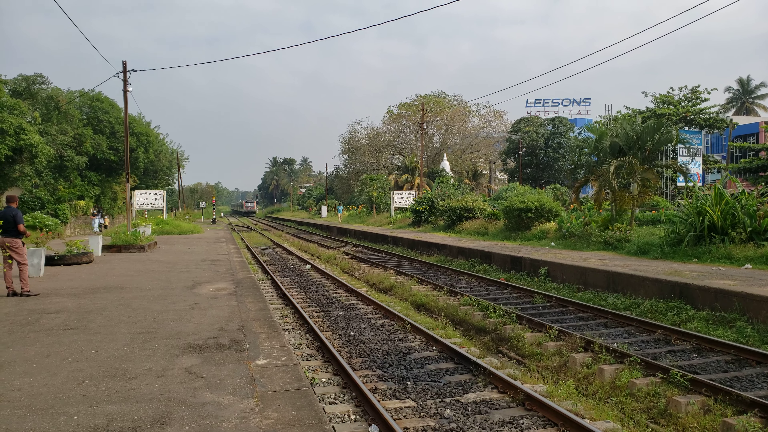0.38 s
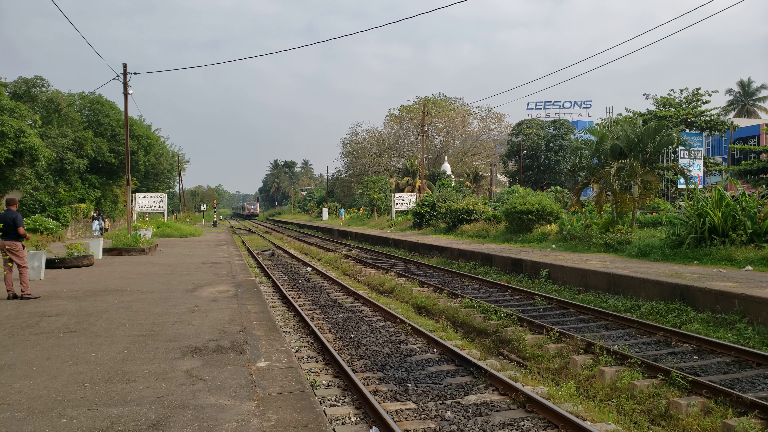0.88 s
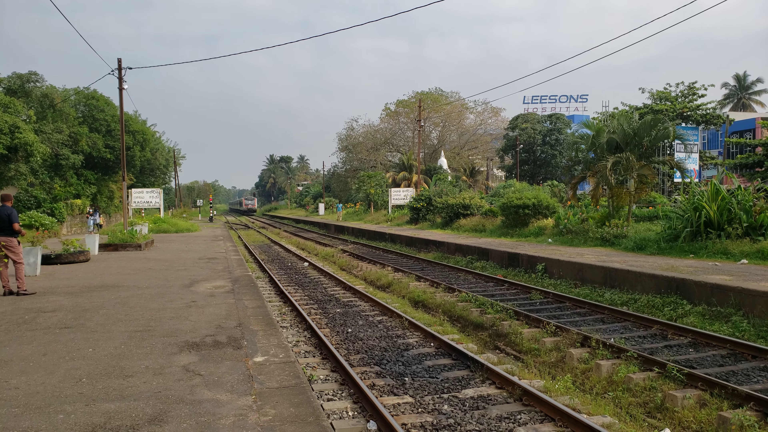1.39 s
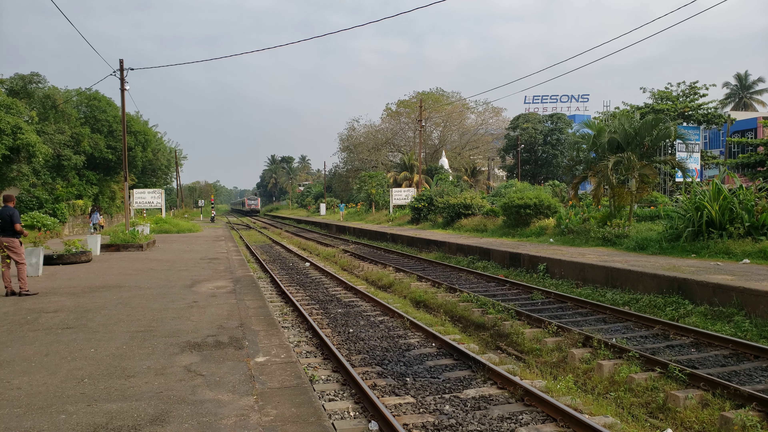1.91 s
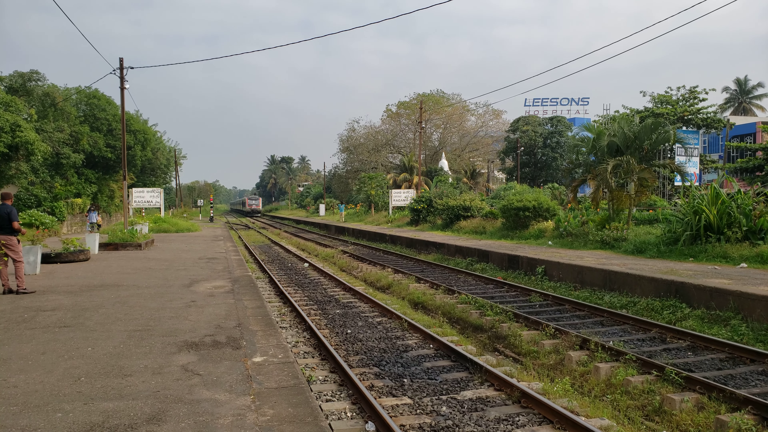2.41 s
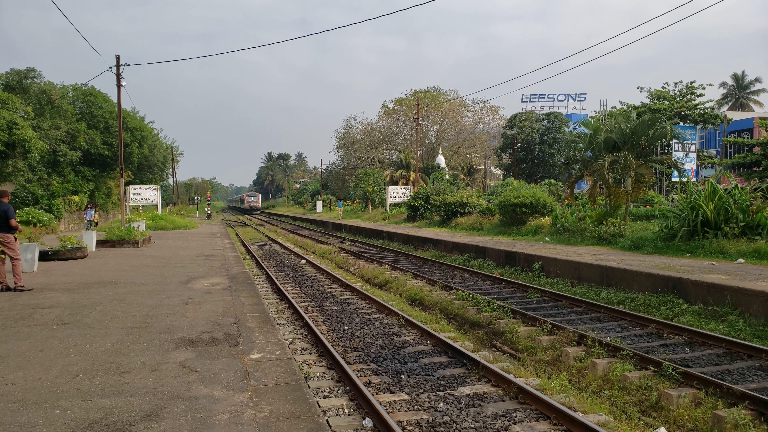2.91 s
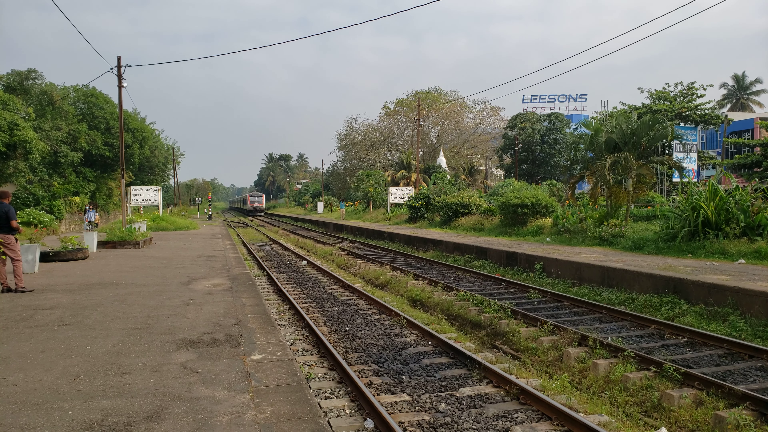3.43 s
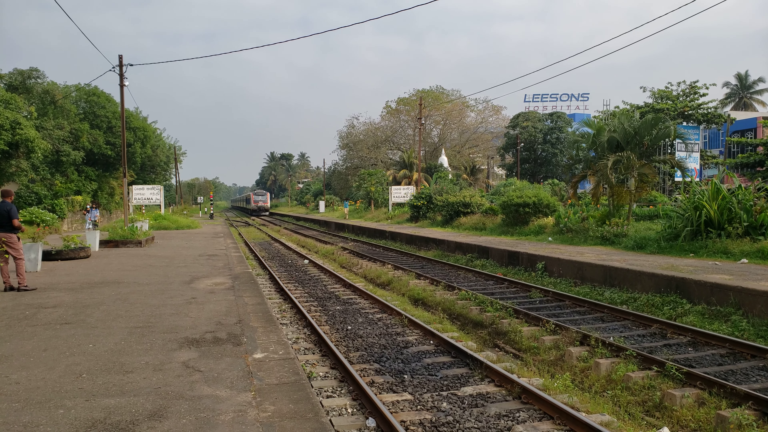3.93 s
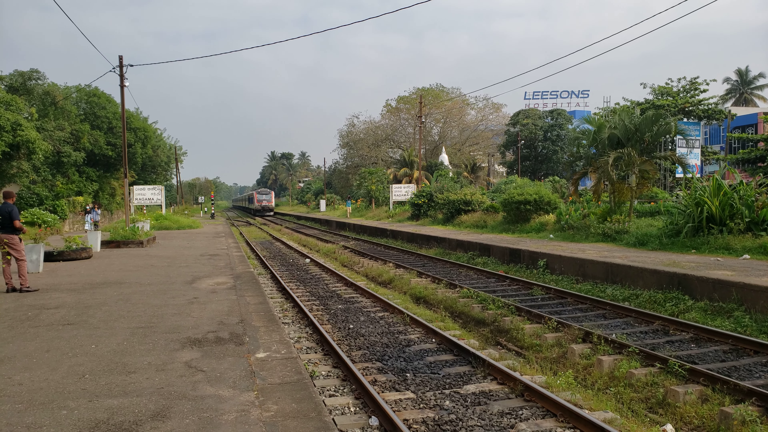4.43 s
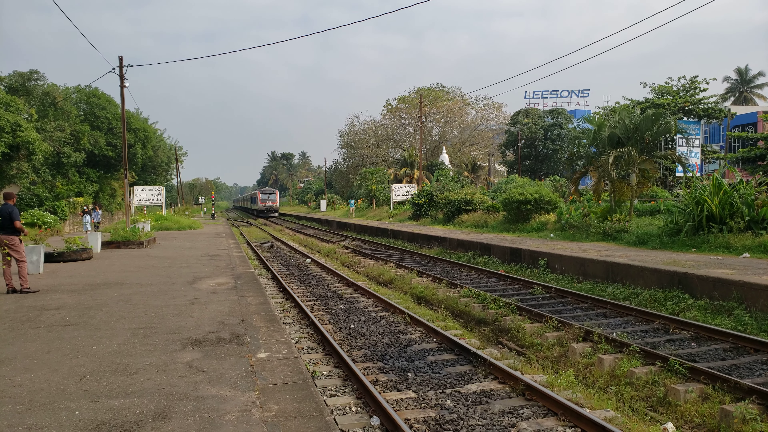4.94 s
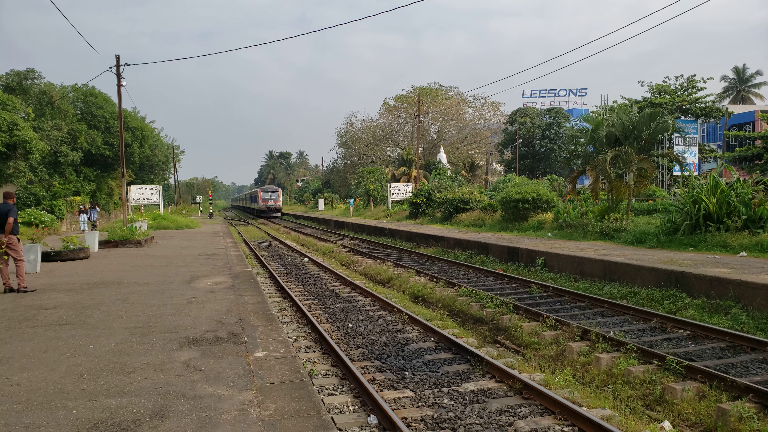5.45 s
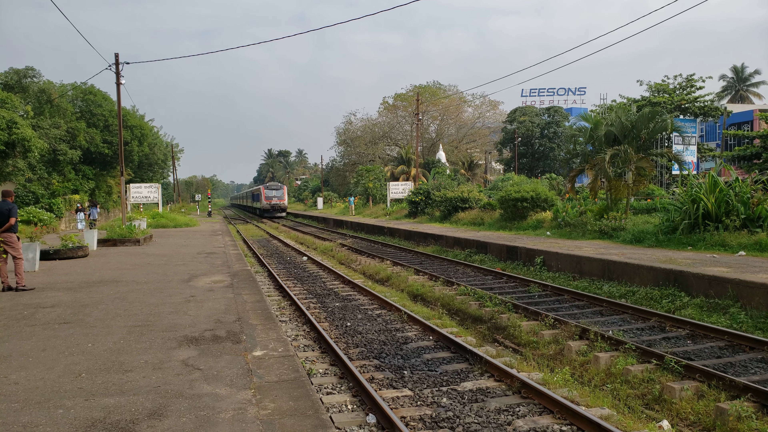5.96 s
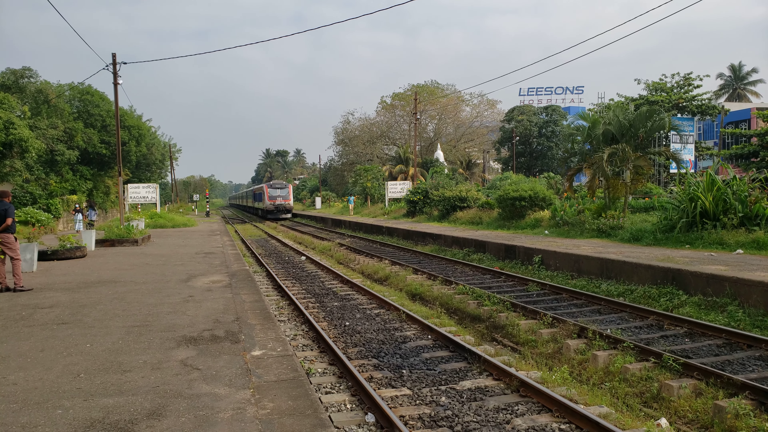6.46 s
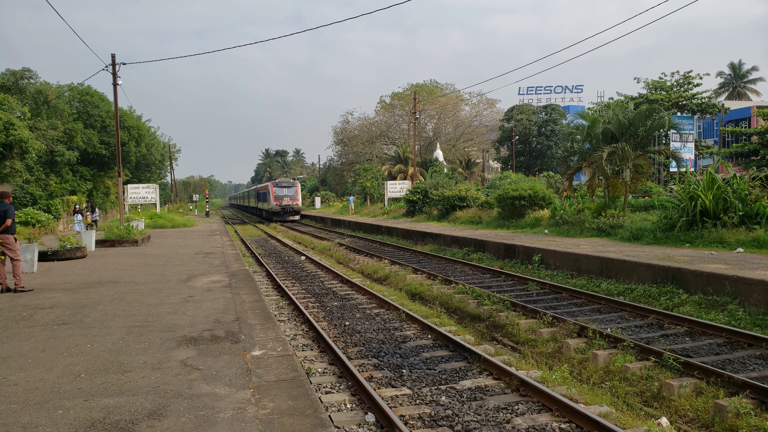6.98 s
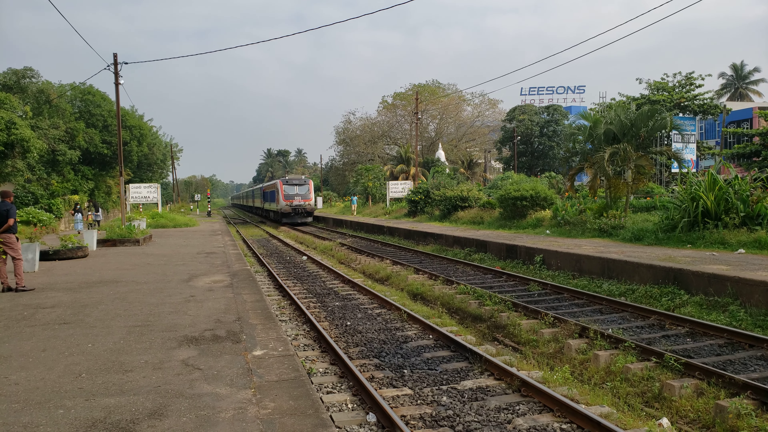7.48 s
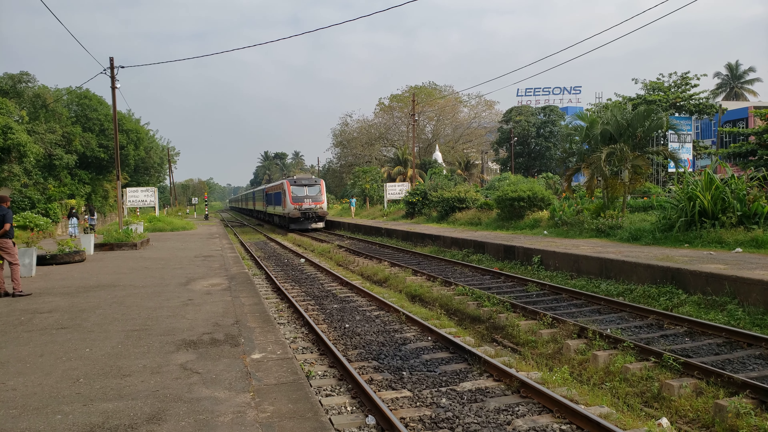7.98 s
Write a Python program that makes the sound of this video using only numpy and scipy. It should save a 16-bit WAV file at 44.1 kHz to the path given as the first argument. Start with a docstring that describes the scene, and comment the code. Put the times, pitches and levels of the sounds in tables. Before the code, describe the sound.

On an open country platform, a big diesel idles close by throughout, its deep uneven throb about four cycles a second, with dull block knocks, light valve clatter and broad fan roar. Soft airy chuffs puff irregularly. A distant train's low drone, rumble and rolling noise swell steadily, still approaching at the end, when a bright hiss bursts in. Stereo outdoor microphone, duller treble on the right.

```python
"""A country platform: a big twelve-cylinder diesel idles close by, another train nears and a bird chirps.
Firing and blower pulses excite resonances of the exhaust stack, block and valve gear; noise makes the fan roar,
soft chuffs, a late burst of hiss and faint patches of very high hiss. The train is a drone, a rumble and rolling
noise that grow as its distance shrinks; the bird is two gliding sines. The right microphone port is muffled from
about 2.5 to 9.5 kHz."""
import sys
import numpy as np
from scipy import signal
from scipy.fft import rfft, irfft, next_fast_len
from scipy.io import wavfile
from scipy.ndimage import uniform_filter1d

SR = 44100
rng = np.random.default_rng(int(sys.argv[2]) if len(sys.argv) > 2 else 0)


def unload_audio(sound):
    """Save the sound as a 16-bit wav file, at the path given as the first command line argument."""
    columns = np.transpose(np.atleast_2d(sound))
    # keep every value between -1 and 1, then stretch to whole-number steps
    steps = np.round(np.clip(columns, -1, 1) * 32767)
    wavfile.write(sys.argv[1], SR, steps.astype(np.int16))


def boost(x):
    """Linear amplitude factor 10**(x/20) for a level x in decibels (scalar or array-like)."""
    u = np.asarray(x, float) / 20
    return 10 ** u


N = 357651

# Firings of the cylinders, in groups of three.
# Each row: crank angle in degrees of a 720-degree cycle, strength of the exhaust pulse in dB.
CYLINDERS = [(46.2, 1.5), (99.1, -3.3), (150.6, -14.2), (232.2, -6.9), (283.7, -7.3), (357.8, -11.2),
             (409.8, -2.1), (463.2, -1.5), (512.0, -7.9), (591.6, -4.3), (641.5, -8.5), (714.4, -3.2)]


def rms_one(x):
    """Normalization: scales a signal to a root mean square of 1."""
    return x / np.sqrt(np.mean(x ** 2) + 1e-20)


def in_time(swells):
    """Level envelope: the sum of Gaussian swells in dB, one value per sample."""
    t = np.arange(N) / SR
    return sum(db * np.exp(-((t - centre) / half) ** 2) for centre, half, db in swells)


def drift(rate_hz):
    """Slow random modulation of rms 1: white noise through a two-pole low-pass filter."""
    step = 40   # samples between the computed values
    r = np.exp(-2 * np.pi * rate_hz * step / SR)
    noise = rng.standard_normal(N // step + 2002)
    slow = signal.lfilter([1], [1, -2 * r, r * r], noise)[2000:]   # past the filter's onset
    return np.interp(np.arange(N) / step, np.arange(len(slow)), rms_one(slow))


def ring(clicks, hz, t60):
    """Damped resonator: a unit click starts a sine of height 1 that decays by 60 dB in t60 seconds."""
    r, w = boost(-60 / (t60 * SR)), 2 * np.pi * hz / SR
    return signal.lfilter([0, np.sin(w)], [1, -2 * r * np.cos(w), r * r], clicks + 1e-18)


def band(low_hz, high_hz, channels=1):
    """Band-limited noise of rms 1: white noise through a Butterworth band-pass filter."""
    sos = signal.butter(2, [low_hz, high_hz], "band", fs=SR, output="sos")
    noise = rng.standard_normal((channels, N + SR))
    return rms_one(signal.sosfilt(sos, noise)[:, SR:])


def ports(x, pan_db, lag):
    """Level and time differences: left over right by pan_db, and the right port later by lag samples."""
    n = np.arange(N)
    left = boost(pan_db / 2) * np.interp(n + lag / 2, n, x)
    right = boost(-pan_db / 2) * np.interp(n - lag / 2, n, x)
    return np.array([left, right])


def bins():
    """Discrete spectrum: its transform size and the frequencies of its bins in Hz."""
    size = next_fast_len(N)
    return size, np.maximum(np.arange(size // 2 + 1) * SR / size, 1)


def at_hz(points, hz):
    """Spectral envelope: interpolates the points along a log-frequency axis."""
    point_hz, value = np.transpose(points)
    return np.interp(np.log(hz), np.log(point_hz), value)


def crank():
    """Rotation phase: cycles turned at each sample, from one second before the start."""
    # The governor hunts, so the crank runs ahead of or behind its mean pace.
    # Each row: time in seconds, lead in crank degrees.
    lead = [(0, 1.6), (.7, .8), (1.2, -1.5), (1.7, -2.7), (2.3, -2.8), (3, -2.1), (4.1, .9), (5.3, 1.1),
            (6.2, 2), (6.8, 1.7), (7.7, 0), (8.1, 0)]
    cycles_per_s = 3.9622
    t = np.arange(-SR, N) / SR
    return t * cycles_per_s + np.interp(t, *np.transpose(lead)) / 720


def beats(turned, degrees, levels_db, uneven_db):
    """Impulse train: a click as the crank passes each angle, its level spread at random by uneven_db."""
    due = np.arange(-3, 33)[:, None] + np.asarray(degrees) / 720   # in cycles
    strength = boost(levels_db + uneven_db * rng.standard_normal(due.shape))
    inside = (due > turned[0]) & (due < turned[-1])
    clicks = np.zeros(len(turned))
    clicks[np.searchsorted(turned, due[inside])] = strength[inside]
    return clicks


def exhaust(turned):
    """Modal excitation: firing and blower pulses ring the stack; only the swing about mean pressure is heard."""
    # Modes of the exhaust stack.
    # Each row: frequency in Hz, level in dB, t60 in seconds, sign.
    stack_modes = [(44.8, -23.3, 0.568, -1), (51.7, -13.8, 0.6, -1), (52.1, -8.5, 0.113, 1),
                   (76.5, -6.0, 0.284, -1), (88.9, -10.9, 0.6, 1), (97.4, -26.4, 0.6, 1),
                   (116.6, -38.1, 0.279, -1), (143.2, -33.6, 0.6, 1), (164.2, -45.5, 0.6, -1),
                   (180.9, -45.5, 0.6, 1), (211.8, -49.1, 0.6, -1)]
    blower_pulses = 15   # even pulses per cycle, from a geared blower
    blower_deg = -3.5 + np.arange(blower_pulses) * 720 / blower_pulses
    firings = beats(turned, *np.transpose(CYLINDERS), uneven_db=.15)
    pulses = firings + beats(turned, blower_deg, 0, uneven_db=.02)
    stack = sum(sign * boost(db) * ring(pulses, hz, t60) for hz, db, t60, sign in stack_modes)[SR:]
    return stack - stack.mean()


def block(turned, apart_per_khz):
    """Modal coupling: firings of equal strength knock the block, each with a lasting gain per mode and port."""
    # Modes of the engine block.
    # Each row: frequency in Hz, mean level in dB, t60 in seconds.
    block_modes = [(143.2, -38.5, 0.25), (165, -38, 0.091), (213.6, -42.5, 0.15), (277, -42.5, 0.15),
                   (306, -42, 0.083), (322.6, -40, 0.18), (372.6, -37, 0.12), (413, -40, 0.12),
                   (447, -38, 0.11), (495, -42.5, 0.051), (531.7, -41.5, 0.12), (566, -40.5, 0.14),
                   (598.6, -43, 0.14), (649.5, -43.5, 0.14), (700, -40, 0.089), (734.5, -43, 0.11),
                   (897, -46.5, 0.12), (1600, -51.5, 0.16)]
    reach = rng.standard_normal((len(block_modes), 3, len(CYLINDERS)))
    out, degrees = np.zeros((2, N)), np.array(CYLINDERS)[:, 0]
    knocks = [beats(turned, [angle], 0, uneven_db=0.0) for angle in degrees]
    for (hz, db, t60), (both, left, right) in zip(block_modes, reach):
        level_db = db + 2.0 * drift(1.0)   # each mode comes and goes as the air between shifts
        own = np.clip(apart_per_khz * hz / 1000, 0, 1)   # the ports differ more as the wavelength shrinks
        for port, side in enumerate((left, right)):
            coupling = rms_one(np.sqrt(1 - own) * both + np.sqrt(own) * side)
            late = 8 * port   # samples
            out[port] += boost(level_db) * ring(coupling @ knocks, hz, t60)[SR - late:][:N]
    return out


def clatter(turned):
    """Impact excitation: each knock is a short rattle of noise that rings its part."""
    # Valve gear and covers.
    # Each row: ring frequency in Hz, t60 in seconds, relative level in dB, left over right in dB,
    # knocks per cycle, angle of the first knock in crank degrees.
    parts = [(685, 0.029, -42, -2.5, 3, 120), (1570, 0.16, -44, -8, 3, 112.7),
             (1853, 0.2, -46, -1.5, 1, 700), (2270, 0.022, -46.5, 1, 1, 22),
             (10500, .006, -73.5, 1, 1, 492)]
    out, rattle = 0, np.hanning(round(0.0053 * SR))
    for hz, t60, db, pan_db, count, first in parts:
        degrees = first + np.arange(round(count)) * 720 / round(count)
        knocks = beats(turned, degrees, db, uneven_db=0.5)
        length = min(len(rattle), round(t60 * SR / 3))   # samples
        envelope = np.convolve(knocks, signal.resample(rattle, length), "same")
        burst = envelope * rng.standard_normal(len(turned))
        out = out + ports(ring(burst, hz, t60)[SR:] / np.sqrt(length / 3), pan_db, lag=20)
    return out


def roar(turned, patchy_db, breath_db):
    """Partially coherent broadband noise: octave bands flicker, and the top breathes twice a cycle with the leaks."""
    # Fan and street roar, before the flicker. Each row: frequency in Hz, density in dB per Hz.
    density = [(22, -72), (32, -63), (45, -53.5), (62, -48), (80, -49.5), (105, -49.5), (135, -56.5),
               (200, -56.5), (300, -60), (460, -60.5), (600, -62.5), (750, -64.5), (810, -66), (1300, -68),
               (1700, -74.5), (2150, -75.5), (2700, -75.5), (3400, -78.5), (4300, -87), (5500, -90),
               (6400, -93.5), (7300, -93), (8000, -101.8), (8800, -105.3), (11300, -109.5), (12800, -115.8),
               (15000, -118.2)]
    # Likeness of the ports. Each row: frequency in Hz, squared left-right coherence.
    likeness = [(60, 1), (100, 0.97), (180, 0.94), (320, 1), (450, 0.61), (560, 0.85), (700, 0.12),
                (1000, 0.042), (1350, 0.18), (1650, 0.78), (2000, 0.38), (2500, 0.052)]
    # Delay of the right port. Each row: frequency in Hz, delay in samples.
    delay = [(1000, 9.1), (1400, 20.5)]
    # Swells of the treble hiss. Each row: centre in seconds, half length in seconds, height in dB.
    hiss_swells = [(0.1, 0.4, 0), (4.85, 0.27, 2.5), (5.7, 0.4, 0.9), (7.23, 0.05, 1), (7.72, 0.035, 1),
                   (8.0, 0.2, 2.5)]
    size, hz = bins()
    alike = np.sqrt(np.clip(at_hz(likeness, hz), 0, 1))
    mid, side = rfft(rng.standard_normal((2, size))) * np.sqrt(SR / 4) * boost(at_hz(density, hz))
    mid, side = np.sqrt(1 + alike) * mid, np.sqrt(1 - alike) * side
    turn = np.exp(1j * np.pi * hz * at_hz(delay, hz) / SR)   # half the delay
    pair = [turn ** sign * (mid + sign * side) for sign in (1, -1)]
    swell = in_time(hiss_swells)
    breath = breath_db * np.cos(4 * np.pi * (turned[SR:] - .37))
    top_db = 0.5 * drift(3.0) + 0.68 * drift(15.0) + breath + swell - swell.mean()
    out = 0
    for centre in 30 * 2. ** np.arange(10):   # Hz
        share = np.clip(1 - np.abs(np.log2(hz / centre)), 0, 1)   # overlapping octave windows
        flicker_db = patchy_db * drift(21.0) + (centre > 3000) * top_db
        out = out + irfft(pair * share, size)[:, :N] * boost(flicker_db)
    return out


def hums():
    """Narrow-band noise: its random envelope makes tones that waver in level."""
    # Hums of the fans and the generator.
    # Each row: frequency in Hz, level in dB rms before the ports, width in Hz.
    hum_bands = [(119.1, -42, 2.1), (164, -45.5, 14), (149.9, -48.5, 1.2), (187.5, -49.5, 1.8),
                 (210.6, -50, 1.7), (239.2, -44, 1.1), (250.2, -46.5, 3.0), (303.4, -51.5, 1.3),
                 (482, -55, 1.7)]
    return sum(boost(db) * band(hz - width / 2, hz + width / 2)[0] for hz, db, width in hum_bands)


def chuffs():
    """Gated noise: each chuff is a short burst near 2 kHz that rises, holds and decays exponentially."""
    # Most fall at one crank angle, so probably a leak at one cylinder.
    # Each row: start in seconds, peak level in dB before the ports.
    chuff_times = [(0.516, -41.5), (1.016, -41), (1.522, -40.5), (2.546, -42.5), (3.784, -44.5),
                   (4.299, -41.5), (4.575, -45), (4.805, -42), (5.305, -42.5), (6.055, -42), (6.319, -43),
                   (6.567, -43.5), (6.895, -45), (7.005, -38.5), (7.165, -41.5), (7.335, -46), (7.577, -45),
                   (7.735, -42), (7.845, -47)]
    rise_s, hold_s, t60_s = 0.018, 0.029, 0.16
    shape, tail = np.zeros(N), np.arange(round(.2 * SR)) / SR
    for start, db in chuff_times:
        i = round(start * SR)
        decay_db = -60 * np.maximum(tail - hold_s, 0) / t60_s
        shape[i:i + len(tail)] += boost(db + decay_db) * np.minimum(tail / rise_s, 1)
    return ports(shape * band(1780, 2240)[0], 0.88, lag=17.5)


def puff():
    """Noise burst: bright noise sets in late, its power rising linearly, then holds, stronger on the left."""
    start_s, rise_s, gain_db = 8.083, .022, -48
    rise = np.clip((np.arange(N) / SR - start_s) / rise_s, 0, 1)
    burst = band(4500, 15000, channels=2) + boost(6.0) * band(4600, 7000, channels=2)
    return boost(gain_db) * boost([[2.5], [-3.0]]) * np.sqrt(rise) * burst


def top_hiss():
    """Amplitude modulation: band noise at 10 to 13 kHz, briefly louder in patches."""
    # Each row: centre in seconds, half length in seconds, height over the level between them in dB.
    patches = [(7.15, 0.2, 12), (7.5, 0.2, 8), (7.8, 0.09, 10), (7.712, 0.024, 19), (7.9, 0.036, 18),
               (7.955, 0.013, 19), (8.02, .04, 17)]
    gain_db = -96.5 + in_time(patches)
    noise = band(9800, 13000, channels=2) + boost(-0.5) * band(11900, 12900, channels=2)
    return boost(gain_db) * noise


def train():
    """Spherical spreading: drone, upper band, rumble, rolling wheels and rail hiss grow as distance shrinks."""
    # Swells of the drone above the distance law, and briefer ones of its upper band.
    # Each row: centre in seconds, half length in seconds, height in dB.
    drone_swells = [(1.6, 0.42, 8), (4.8, 1.0, 12.5), (7.1, 0.9, 10)]
    upper_swells = [(4.75, 0.17, 4.5), (7.3, 0.46, 16.5)]
    start_m, speed_m_per_s, loss_db_per_100m = 258, 20.3, 0.5   # extra loss over grass and air
    drone_db, upper_db, rumble_db, rolling_db, hiss_db = -38.5, -49.5, -40.5, -40.5, -44   # gains at 100 m
    hundreds = (start_m - speed_m_per_s * np.arange(N) / SR) / 100   # distance in 100 m
    near_db = -20 * np.log10(hundreds) - loss_db_per_100m * (hundreds - 1)

    drone_hz = 79.4 + 0.16 * drift(0.95)
    tone = np.sqrt(2) * np.sin(2 * np.pi * np.cumsum(drone_hz) / SR)
    drone = boost(drone_db + near_db + in_time(drone_swells)) * tone
    upper = boost(upper_db + near_db + in_time(upper_swells)) * band(147, 156)[0]
    rumble = boost(rumble_db + near_db) * band(100, 240)[0]

    rolling = band(420, 1700, channels=2) + boost(-6.0 + 1.3 * drift(4.3)) * band(1750, 2190, channels=2)
    rolling = signal.sosfilt(signal.butter(2, 3500, fs=SR, output="sos"), rolling)   # air dulls the top
    rolling = boost(rolling_db + near_db + 1.3 * drift(3.6)) * rolling   # the level flutters

    to_right = boost([[-7.0], [3.5]])   # the line lies to the right
    hiss = boost(hiss_db + near_db) * to_right * band(2250, 4700, channels=2)
    hiss = signal.sosfilt(signal.butter(6, 4000, fs=SR, output="sos"), hiss)
    return ports(drone + upper + rumble, .8, lag=5) + rolling + hiss


def bird():
    """Frequency modulation: short gliding whistles with a random amplitude flutter."""
    # Each row: start in seconds, length in seconds, first and last frequency in Hz,
    # level in dB rms before the flutter and the ports.
    whistles = [(4.746, .046, 7860, 7960, -69), (8.084, .024, 7600, 5500, -50)]
    out = np.zeros(N)
    for start, length, from_hz, to_hz, db in whistles:
        i, n = round(start * SR), round(length * SR)
        glide_hz = np.linspace(from_hz, to_hz, n)
        note = np.sin(2 * np.pi * np.cumsum(glide_hz) / SR) * np.hanning(n) ** .5
        smooth = uniform_filter1d(rng.standard_normal(n), size=120)
        note *= 1 + 0.4 * rms_one(uniform_filter1d(smooth, size=120))   # a hoarse flutter
        out[i:i + n] += (2 * boost(db) * note)[:N - i]
    return out


def scene():
    """Superposition: the pressures of all sources add at the two ports."""
    turned = crank()
    engine = ports(exhaust(turned) + hums(), .8, lag=8)
    engine = engine + block(turned, apart_per_khz=0.62) + clatter(turned)
    engine = engine + roar(turned, patchy_db=0.5, breath_db=0.5)
    return engine + chuffs() + puff() + top_hiss() + train() + ports(bird(), 15.0, lag=11)


def top_cut(x):
    """Nothing passes above the cut-off."""
    return signal.sosfilt(signal.butter(12, 15720, fs=SR, output="sos"), x)


def record(dry):
    """Linear filtering: the right port has a frequency response of its own."""
    # Right port against the left. Each row: frequency in Hz, gain in dB.
    right_gain = [(400, 0), (900, 1.5), (1500, 3.5), (2100, 4.5), (2600, -4), (3400, -14), (4300, -17.5),
                  (5500, -26.5), (6400, -31.5), (7200, -39), (8600, -29.5), (9400, -5.5), (11300, 2.5),
                  (12800, 0), (14000, -6.5), (15000, -9.3)]
    mirrored = np.r_[dry[1], dry[1][::-1]]   # no jump at the ends
    size = next_fast_len(2 * N)
    hz = np.maximum(np.arange(size // 2 + 1) * SR / size, 1)
    spectrum = rfft(np.pad(mirrored, (0, size - 2 * N), "edge"))
    right = irfft(spectrum * boost(at_hz(right_gain, hz)), size)[:N]
    return top_cut(np.array([dry[0], right]))


dry = scene()
out = record(dry)
unload_audio(out)
```